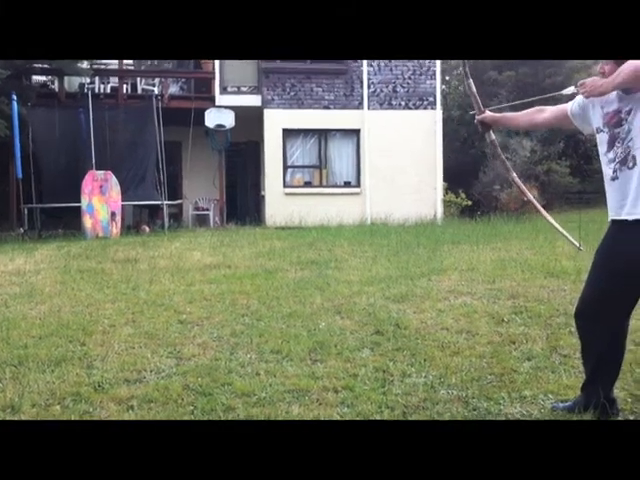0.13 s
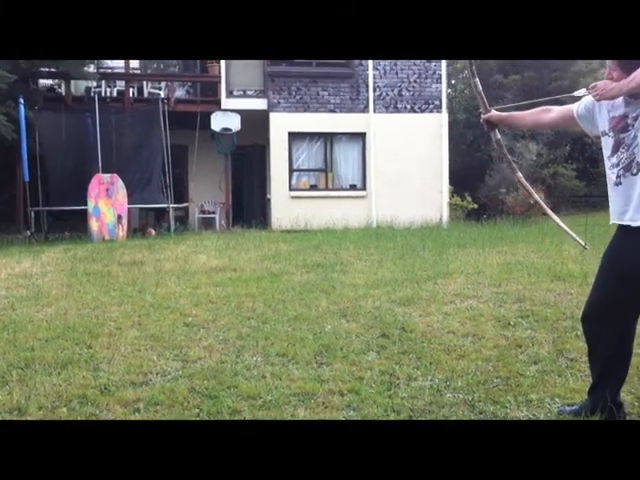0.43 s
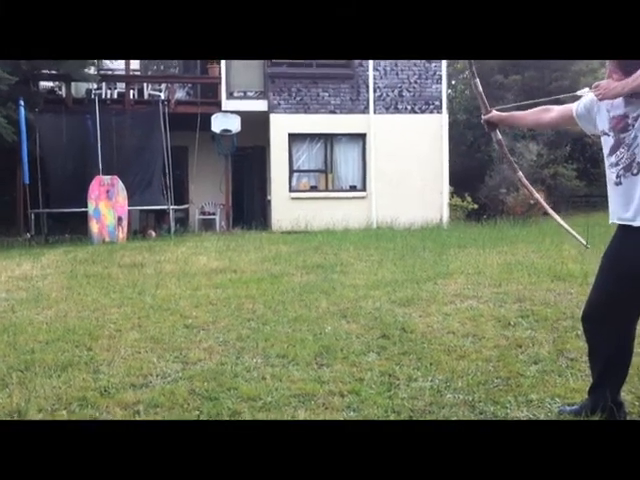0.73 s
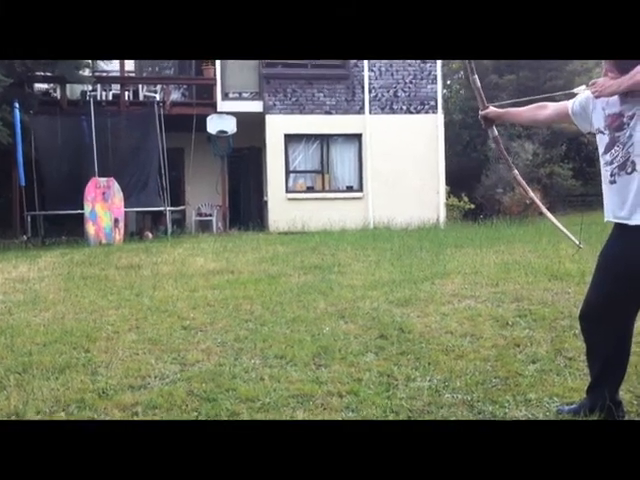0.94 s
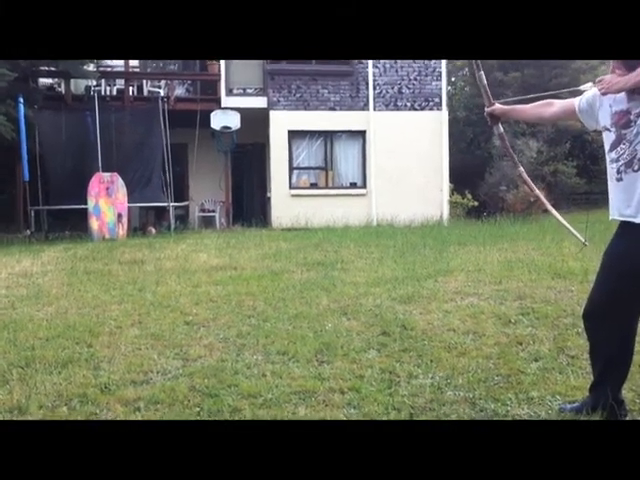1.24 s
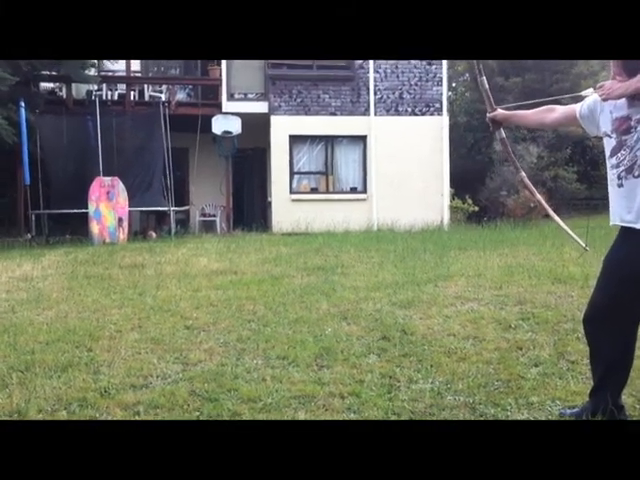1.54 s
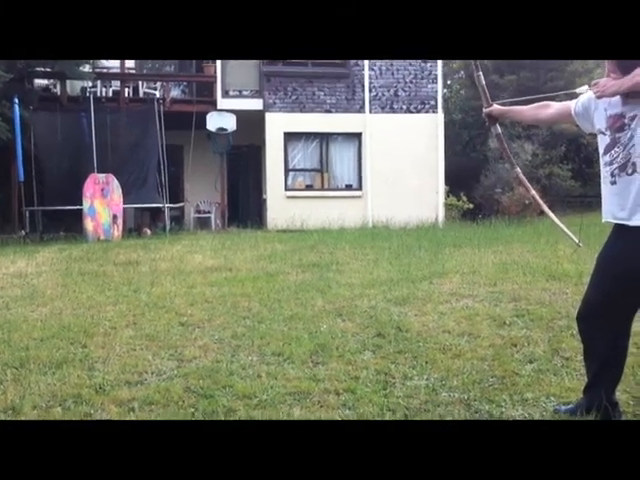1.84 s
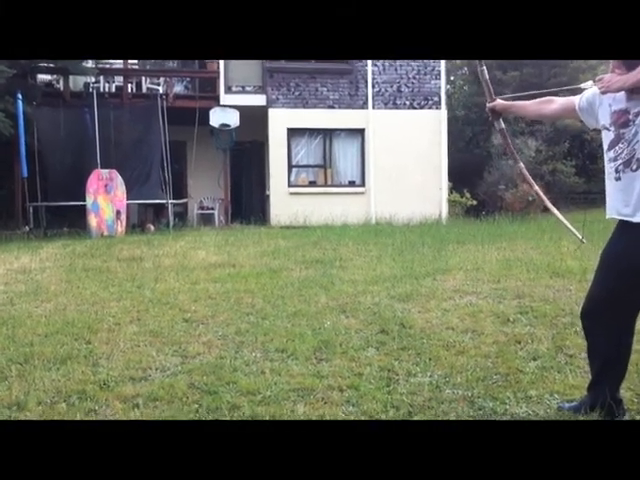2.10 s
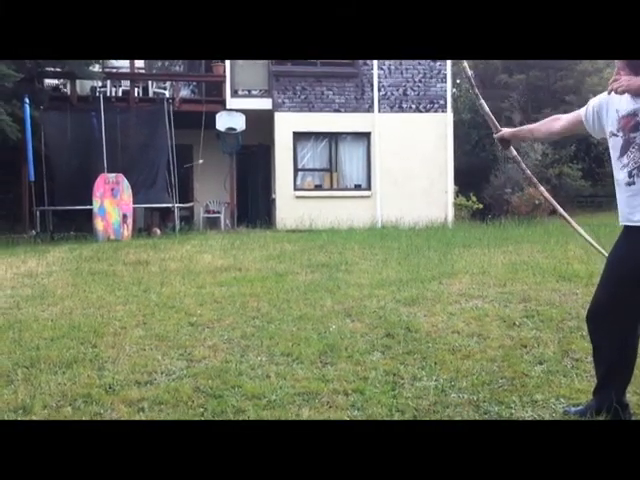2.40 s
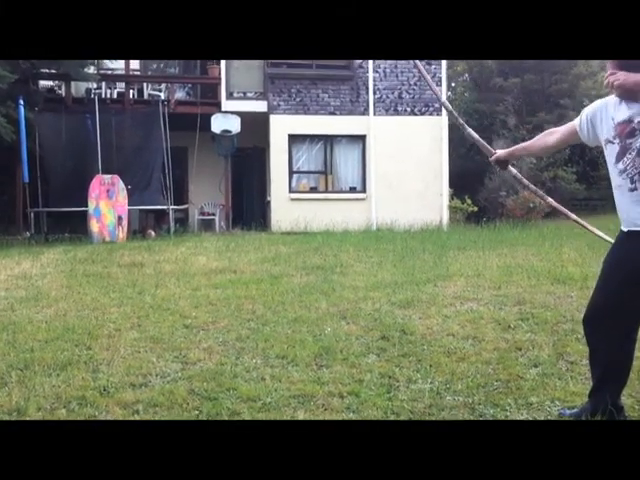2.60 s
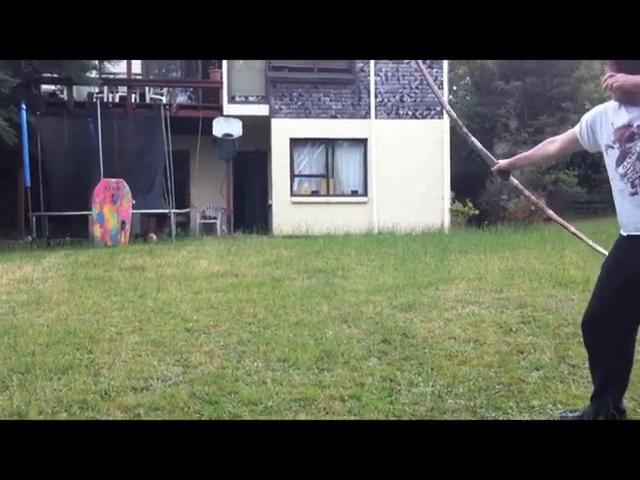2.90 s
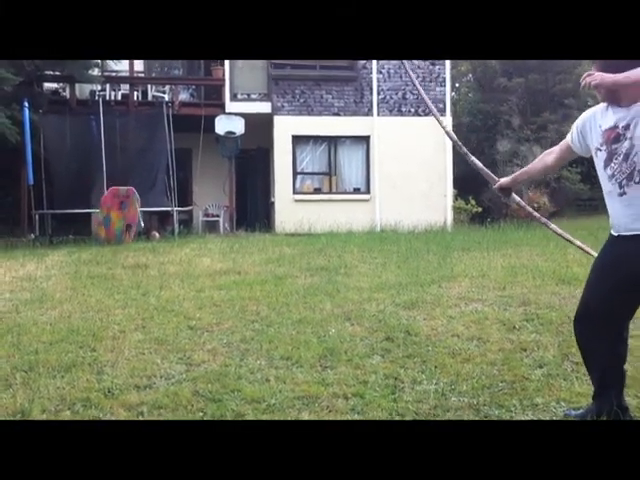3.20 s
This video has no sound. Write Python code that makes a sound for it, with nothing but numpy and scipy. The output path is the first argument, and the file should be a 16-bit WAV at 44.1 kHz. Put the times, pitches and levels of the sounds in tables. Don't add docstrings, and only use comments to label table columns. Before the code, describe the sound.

A wooden bow is loosed close by with a sharp clattering snap, then an arrow thwacks a board.

```python
import sys
import numpy as np
from scipy import signal
from scipy.io import wavfile
from scipy.ndimage import uniform_filter1d

SR = 44100
rng = np.random.default_rng(int(sys.argv[2]) if len(sys.argv) > 2 else 0)


def persist_wave(psi):
    counts = np.round(np.clip(psi, -1, 1) * 32767).astype(np.int16)
    wavfile.write(sys.argv[1], SR, np.atleast_2d(counts).T)


def voltage_ratio(level):
    return 10 ** (np.asarray(level, float) / 20)


N = 147735
T = np.arange(N) / SR


def set_rms(x, db):
    return x * voltage_ratio(db) / np.sqrt(np.mean(x ** 2))


def butter(x, order, hz, kind):
    return signal.sosfilt(signal.butter(order, hz, kind, fs=SR, output="sos"), x)


def band(x, hz, order=2):
    return butter(x, order, [hz / np.sqrt(2), min(hz * np.sqrt(2), SR / 2.2)], "band")


def highs(x, hz):
    return butter(x, 2, hz, "high")


def conv(x, response):
    return signal.fftconvolve(x, response)[:N]


def ring(modes, damp=1, sign=-1):
    t = T[:SR // 2]
    out = 0
    for k, (hz, db, t60) in enumerate(modes):
        decay = voltage_ratio(-60 * t / t60 / damp) / damp ** .5
        out = out + sign ** k * voltage_ratio(db) * np.sin(2 * np.pi * hz * t) * decay
    return out


def burst(s, ms, count=400):
    out, k = np.zeros(N), int(s * SR)
    force = np.sin(np.pi * np.clip((T[k:k + count] - s) / ms * 1000, 0, 1)) ** .5
    grit = force * rng.standard_normal(count)
    out[k:k + count] = grit / np.sqrt(np.sum(grit ** 2))
    return out


def clicks(rows):
    out = np.zeros(N)
    out[[int(r[0] * SR) for r in rows]] = [voltage_ratio(r[1]) for r in rows]
    return out


def walk(rate):
    k = int(SR / rate)
    steps = np.repeat(rng.standard_normal(N // k + 1), k)
    return 1.25 * uniform_filter1d(uniform_filter1d(steps, k), k)[:N]


def blur(x, t60):
    t = T[:SR // 2]
    tail = rng.standard_normal(len(t)) * voltage_ratio(-60 * t / t60)
    return conv(x, tail / np.sqrt(np.sum(tail ** 2)))


# pitch_hz [Hz], t60_s [s]
YARD_DECAY = [(150, 0.55), (600, 0.87), (2000, 0.41), (5000, 0.46), (12000, 0.32)]


def yard(x, wet_db, echoes):
    t, table = T[:SR * 2 // 3], np.array(YARD_DECAY)
    tail = 0
    for hz in 100 * 2. ** np.arange(8):
        t60 = np.interp(np.log(hz), np.log(table[:, 0]), table[:, 1])
        tail = tail + band(rng.standard_normal(len(t)), hz) * voltage_ratio(-60 * t / t60)
    tail = tail * np.clip(t / 0.0018, 0, 1)
    tail = voltage_ratio(wet_db) * tail / np.sqrt(np.sum(tail ** 2))
    walls = sum(voltage_ratio(db) * burst(s, 3.5) for s, db in echoes)
    walls = butter(walls, 2, 4970, "low")
    return conv(x, tail + walls[:len(t)])


# pitch_hz [Hz], level_db [dB per Hz]
TRAFFIC_SPECTRUM = [(15, -44), (25, 5), (48, -10), (277, -0.5), (515, -5.5), (655, -11), (832, -16.5),
                    (958, -7.5), (3000, -20.5), (3900, -51), (6600, -120)]
# start_s [s], level_db [dB]
TRAFFIC_SWELL = [(0, 1.6), (.5, 1.5), (1.3, 1), (1.6, 2), (2.0, 3), (2.5, 3), (3.0, 3), (3.35, 3)]


def town():
    table, out = np.array(TRAFFIC_SPECTRUM), 0
    for hz in 30 * 2 ** np.arange(0, 7, .5):
        db = np.interp(np.log(hz), np.log(table[:, 0]), table[:, 1])
        db = db + 1.1 * walk(2.68) + 1.25 * walk(14)
        noise = band(band(rng.standard_normal(N), hz * 1.012), hz / 1.206)
        out = out + voltage_ratio(db) * noise
    return set_rms(out, -59.5) * voltage_ratio(np.interp(T, *np.array(TRAFFIC_SWELL).T))


def tick():
    modes = [(5060, -2.5, 0.0045), (10000, -5, .002), (14000, 1, .002)]  # Hz, dB, t60 s
    return 4 * voltage_ratio(-54.5) * conv(burst(0.0266, 2.5), ring(modes))


def add_glide(out, s, length, from_hz, to_hz, db):
    k = int(s * SR)
    u = np.arange(min(int(length * SR), N - k)) / (length * SR)
    phase = 2 * np.pi * np.cumsum(from_hz + (to_hz - from_hz) * u) / SR
    out[k:k + len(u)] += voltage_ratio(db) * np.sqrt(2) * np.sin(np.pi * u) * np.sin(phase)


# start_s [s], length_s [s], from_hz [Hz], to_hz [Hz], level_db [dB]
BIRD_NOTES = [(0.164, 0.016, 3690, 3810, -62), (.06, 0.038, 2850, 2900, -70),
              (0.192, 0.02, 3650, 3450, -63), (0.213, .022, 3850, 3550, -60.5),
              (.262, .018, 2940, 2900, -65), (0.319, 0.011, 3000, 2800, -65), (.435, .016, 3450, 3500, -65),
              (2.555, .022, 2690, 2600, -66), (0.25, 0.043, 2076, 1990, -63),
              (0.314, 0.062, 2017, 1980, -66), (0.72, .02, 4700, 3530, -58),
              (0.753, 0.0194, 4270, 3450, -60), (0.345, 0.022, 3280, 3410, -64),
              (1.125, 0.028, 3510, 3290, -64.5), (1.173, 0.015, 3850, 3620, -66),
              (1.228, .012, 3790, 3300, -61.5), (1.275, 0.014, 3220, 2900, -65),
              (1.737, 0.0083, 3370, 4380, -61), (1.763, 0.017, 4115, 3275, -49.5),
              (1.795, 0.019, 3595, 3450, -54), (1.889, 0.024, 3210, 3480, -66),
              (2.288, 0.013, 4180, 3540, -58), (2.737, 0.041, 4080, 4320, -60),
              (2.766, 0.023, 4190, 3580, -54), (2.802, 0.024, 3486, 3950, -56),
              (2.814, 0.024, 3940, 3420, -57), (3.246, 0.011, 3980, 3470, -61.5),
              (3.295, 0.014, 3800, 3520, -61)]
# start_s [s], length_s [s], from_hz [Hz], to_hz [Hz], level_db [dB]
FAR_WHISTLES = [
    (.59, .12, 3780, 4230, -65),
    (.985, .055, 7700, 6400, -63),
    (1.03, .05, 6700, 5600, -63),
    (1.07, .06, 6300, 5600, -67),
    (2.576, .04, 4510, 4610, -66),
]
# start_s [s], length_s [s], centre_hz [Hz], spread_hz [Hz], level_db [dB]
TWITTERING = [(0.168, 0.11, 3794, 820, -66), (0.293, 0.096, 3567, 1150, -66), (0.547, 0.16, 3914, 506, -65),
              (0.691, 0.11, 4113, 1000, -58), (1.067, 0.2, 3840, 913, -67.5), (1.343, 0.15, 3950, 450, -72),
              (1.792, 0.099, 3700, 710, -63.5), (1.964, 0.066, 4215, 693, -62.5),
              (2.099, .19, 3830, 596, -70.5), (2.837, 0.082, 3800, 404, -72), (3.03, 0.081, 4026, 740, -63),
              (3.146, 0.18, 3804, 490, -70)]


def birds(count=40):
    near, far = np.zeros(N), np.zeros(N)
    for note in BIRD_NOTES:
        add_glide(near, *note)
    for whistle in FAR_WHISTLES:
        add_glide(far, *whistle)
    tweet_s, tweet_fall = 0.0136, 0.208
    for s, length, hz, spread, db in TWITTERING:
        for when, where, slope, size in rng.random((count, 4)):
            scatter = (2 * where - 1) * (0.737 + .5 * when)
            mid = hz + spread * scatter - 0.19 * spread * when
            fall = tweet_fall * (2 * slope - .5)
            start, end = mid * (1 + fall / 2), mid * (1 - fall / 2)
            add_glide(far, s + when * length, tweet_s, start, end, db - 6.5 + 4 * size)
    near_t60_s, near_wet_db, far_t60_s, far_dry_db = 0.38, -6, .42, -11
    near = near + voltage_ratio(near_wet_db) * blur(near, near_t60_s)
    return near + voltage_ratio(far_dry_db) * far + blur(far, far_t60_s)


# start_s [s], length_s [s], pitch_hz [Hz], level_db [dB]
PASSING_CAR = (1.53, .3, 1600, -62.5)


def car():
    s, length, hz, db = PASSING_CAR
    u = np.clip((T - s) / length, 0, 9)
    tyres = butter(rng.standard_normal(N), 2, [hz * 0.74, hz * 1.27], "band")
    return set_rms(tyres, db) * np.minimum(u * 8, 1) * np.exp(-2 * u)


# [dB, bow-wood share]
SHAFT_KNOCKS = [(2.3021, -41, 3.3, 1), (2.3032, -44, 2.2, 1), (2.3059, -20, .6, -16),
                (2.30645, -23, .8, -22), (2.30725, -20.5, 1.1, -13), (2.3078, -21, 0.36, -10),
                (2.3116, -33, 2.7, 5), (2.3177, -17, .6, -8), (2.3185, -18.5, 0.4, -11),
                (2.3193, -23.5, 0.44, 4.5), (2.3209, -25.5, .6, 4), (2.3233, -19, 0.45, -12),
                (2.3246, -24, .6, -5), (2.3254, -17, .8, -3.5), (2.3265, -17, 0.69, -11),
                (2.3284, -21, 0.61, -0.5), (2.3295, -25, 1.2, -10), (2.3322, -28, 1.5, -0.5),
                (2.334, -27, 1.2, 2)]
# pitch_hz [Hz], level_db [dB], t60_s [s]
SHAFT_MODES = [(3690, 5, 0.0064), (4320, -1.5, 0.007), (5500, -8, 0.0087), (5940, -18, 0.008),
               (8200, -12, 0.004), (11600, -13, 0.0038)]
# pitch_hz [Hz], level_db [dB], t60_s [s]
BOW_MODES = [(300, -22.5, 0.065), (427, -16.5, 0.033), (866, -22, 0.057), (1135, -16.5, 0.035),
             (1510, -14, 0.05), (1870, -2, 0.024), (2240, -5.5, 0.039), (2590, -9.5, 0.01),
             (3100, -10.5, 0.03)]
# delay_s [s], level_db [dB]
RELEASE_ECHOES = [(.035, -42), (0.068, -37), (.085, -41), (.118, -30)]


def release():
    strikes = [voltage_ratio(db) * burst(s, ms) for s, db, ms, _ in SHAFT_KNOCKS]
    grit = sum(strikes)
    wood = sum(0.52 * voltage_ratio(row[3]) * strike for row, strike in zip(SHAFT_KNOCKS, strikes))
    sharp = clicks(SHAFT_KNOCKS)
    blunt = clicks([(s, db + wood_db) for s, db, _, wood_db in SHAFT_KNOCKS])

    def bodies(bow_force, scrape, damp):
        shaft = highs(conv(sharp, ring(SHAFT_MODES, damp, sign=0.99)), 3080)
        bow = highs(conv(bow_force, ring(BOW_MODES, damp)), 220)
        return shaft + 0.94 * bow + band(scrape, 9600)

    near = bodies(wood + blunt, grit, 1)
    far = bodies(blunt, sharp, 0.19)
    return 0.55 * (near + yard(far, -13.5, RELEASE_ECHOES))


# start_s [s], length_ms [ms], level_db [dB re the
CRACKLE = [
    (2.6162, 4.5, -21),
    (2.6208, 2.2, -1),
    (2.6232, 2.0, -7),
]
# start_s [s], level_db [dB], contact_ms [ms]
POINT_DIG = [
    (2.6205, -15.5, 0.85),
    (2.62155, -11, .25),
    (2.62212, -15, .25),
    (2.6238, -22, .4),
]
# pitch_hz [Hz], level_db [dB], t60_s [s]
BOARD_MODES = [(955, -7, 0.012), (1570, -2, 0.0052), (1770, -4, 0.0042), (2020, -4.5, 0.0089),
               (2860, -12, 0.027)]
# pitch_hz [Hz], level_db [dB], t60_s [s]
DRUM_MODES = [(160, -4.5, 0.2), (209.6, 0, 0.079), (276, 3, 0.041), (321, -1, 0.077), (359, -0.5, 0.087)]
# delay_s [s], level_db [dB]
CLACK_ECHOES = [(.015, -16), (.0205, -21), (.026, -20), (.031, -27), (.0345, -8.5), (.041, -14),
                (.054, -14)]
# delay_s [s], level_db [dB]
BOOM_REPEATS = [(.0056, 0.5), (0.0119, -5.5), (0.0156, -3), (.0195, -9), (.034, -6), (.0525, -4)]
# start_s [s], level_db [dB]
ROPE_BUMPS = [
    (2.861, -46),
    (3.021, -43.5),
    (3.074, -44.5),
]


def hit():
    hit_s, crack_db, crack_hz = 2.6203, -6.5, 4900
    dig = 0
    for s, db, ms in POINT_DIG:
        dig = dig - uniform_filter1d(clicks([(s, db)]), max(int(ms * SR / 2000), 1))
    crackle = sum(voltage_ratio(db) * burst(s, ms) for s, ms, db in CRACKLE)
    crack = voltage_ratio(crack_db) * highs(crackle, crack_hz)
    clack = highs(highs(conv(dig, ring(BOARD_MODES, sign=0.79)), 720), 720)
    far = 1.09 * band(conv(clicks(POINT_DIG), ring(BOARD_MODES, 0.16, sign=0.64)), 1830, order=1)
    far = far + highs(clicks([(hit_s, crack_db)]), crack_hz)
    drum_lag_s, push_ms = 0.0001, 2.3
    push = np.sin(np.pi * np.clip((T - hit_s - drum_lag_s) / push_ms * 1000, 0, 1)) ** 2
    boom = conv(push / push.sum(), ring(DRUM_MODES, sign=0.92))
    boom = voltage_ratio(-25.5) * band(boom, 242, order=1)
    boom_back = sum(voltage_ratio(db) * np.roll(boom, int(s * SR)) for s, db in BOOM_REPEATS)
    boom_tail = yard(boom, -12, [(.09, -32)])
    bumps = sum(voltage_ratio(db) * burst(s, 4.9) for s, db in ROPE_BUMPS)
    bumps = conv(bumps, ring([(98, 0, 0.072)]))
    return clack + crack + yard(far, -8, CLACK_ECHOES) + boom + boom_back + boom_tail + bumps


def scene():
    return (town() + tick() + birds() + car() + release() + hit())[None]


def low_pass(x):
    return signal.sosfilt(signal.butter(12, 16670, fs=SR, output="sos"), x)


# pitch_hz [Hz], level_db [dB]
MIC_HISS = [(1000, -24), (2000, 1.1), (4000, 3.5), (8000, -2.5), (14000, -3.5)]
# start_s [s], length_ms [ms], low_hz [Hz], high_hz [Hz]
DROPOUTS = [
    (2.296, 16, 14200, 17000),
    (2.3105, 5, 7300, 9000),
    (2.333, 7, 7300, 10500),
    (2.334, 9, 14300, 17000),
    (2.604, 11.5, 1050, 4300),
    (2.604, 11.5, 4900, 17000),
]


def record(dry):
    hiss = sum(voltage_ratio(db) * band(rng.standard_normal(N), hz) for hz, db in MIC_HISS)
    x = highs(dry, 117) + set_rms(hiss, -66)
    x = signal.sosfilt(signal.ellip(8, .2, 45, 15800, fs=SR, output="sos"), x)
    for s, ms, lo_hz, hi_hz in DROPOUTS:
        inside = np.abs(T - s - ms / 2000) < ms / 2000
        gap = uniform_filter1d(1. * inside, size=80)
        lost_band = signal.butter(5, [lo_hz, hi_hz], "band", fs=SR, output="sos")
        x = x - gap * signal.sosfiltfilt(lost_band, x)
    return low_pass(x)


dry = scene()
out = record(dry)
persist_wave(out)
```